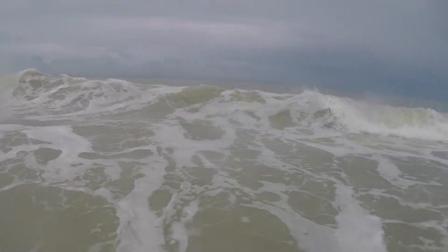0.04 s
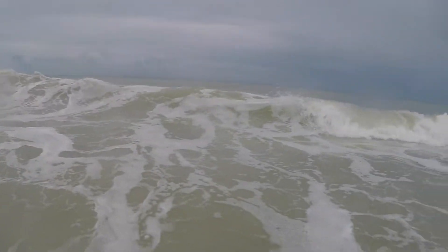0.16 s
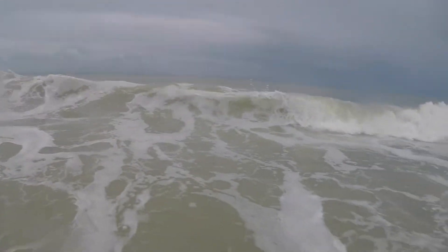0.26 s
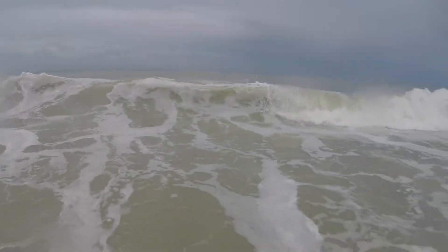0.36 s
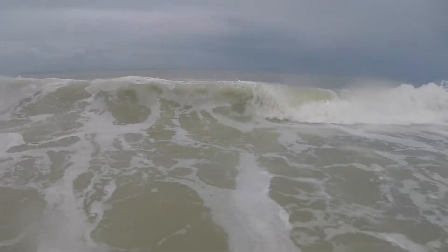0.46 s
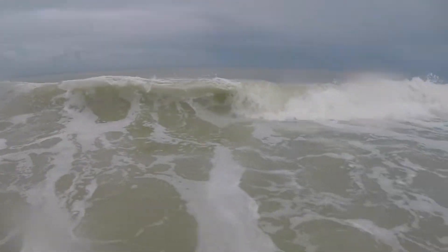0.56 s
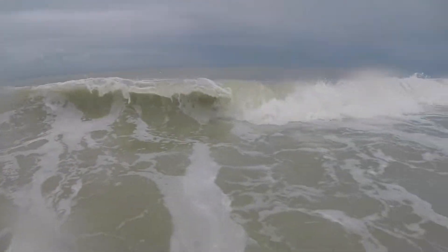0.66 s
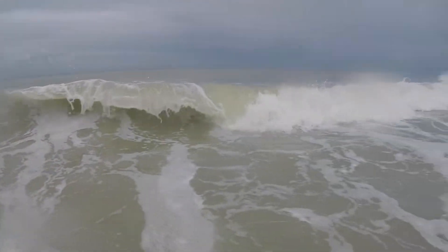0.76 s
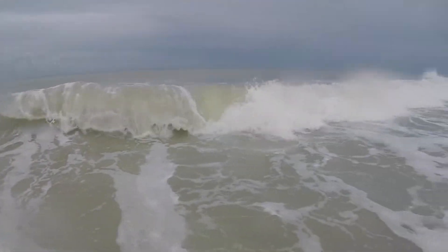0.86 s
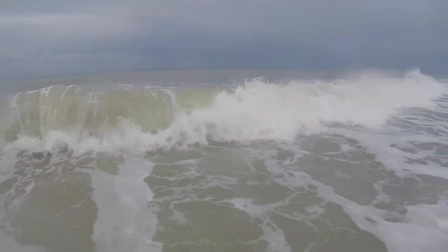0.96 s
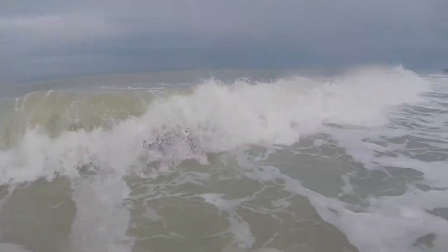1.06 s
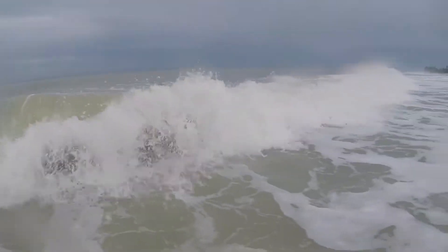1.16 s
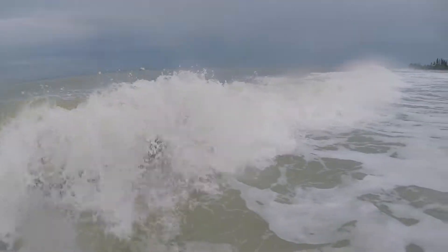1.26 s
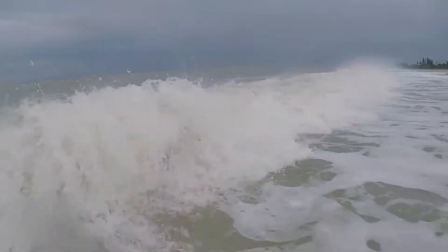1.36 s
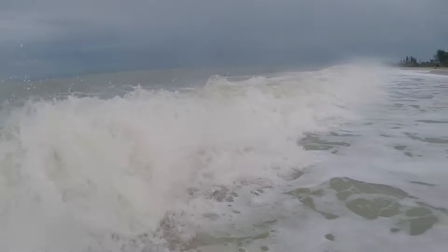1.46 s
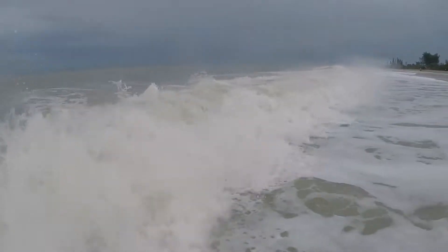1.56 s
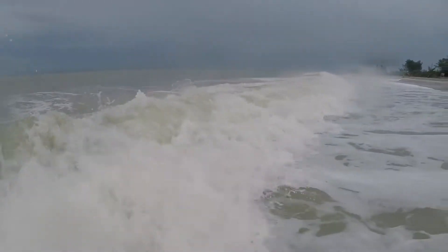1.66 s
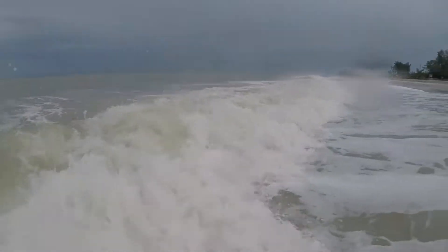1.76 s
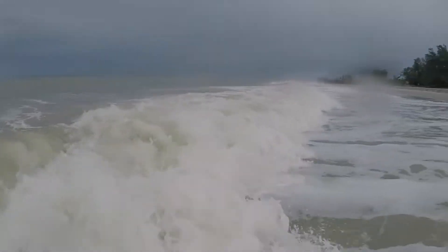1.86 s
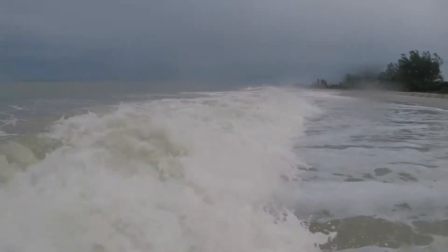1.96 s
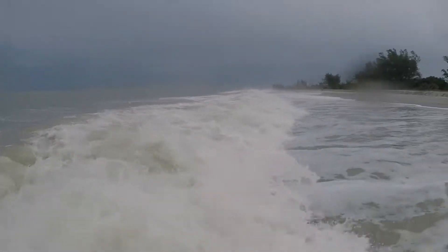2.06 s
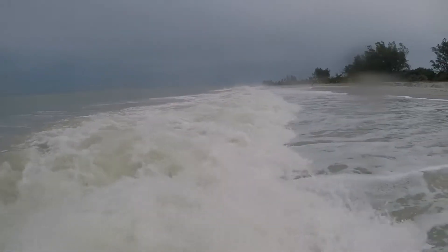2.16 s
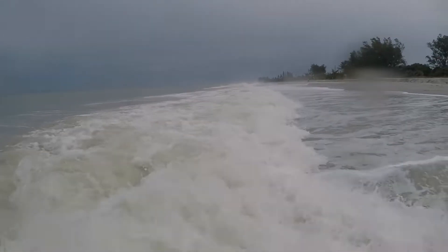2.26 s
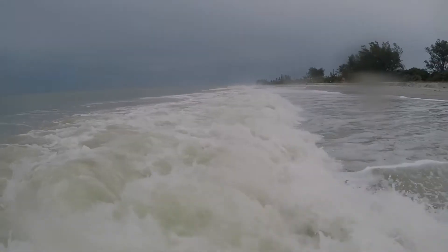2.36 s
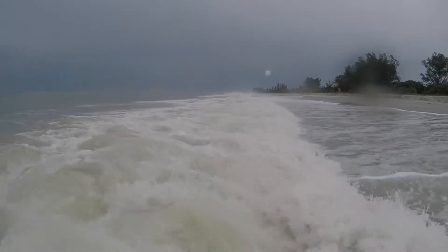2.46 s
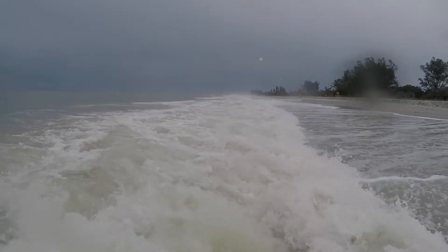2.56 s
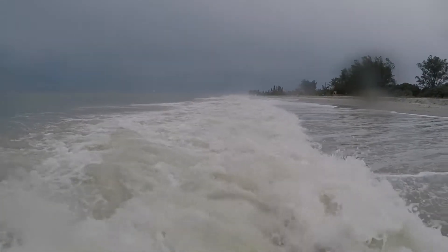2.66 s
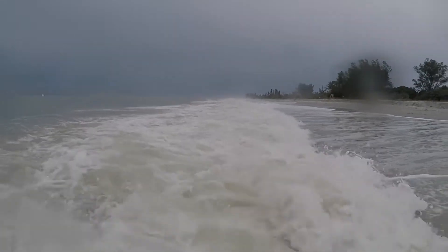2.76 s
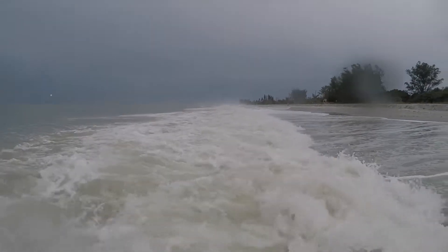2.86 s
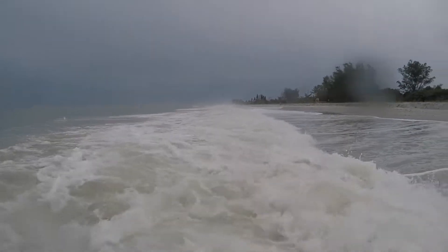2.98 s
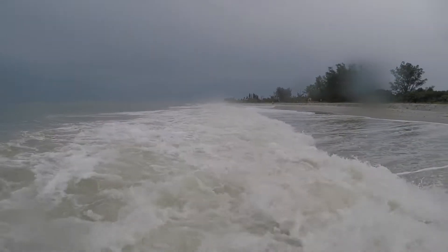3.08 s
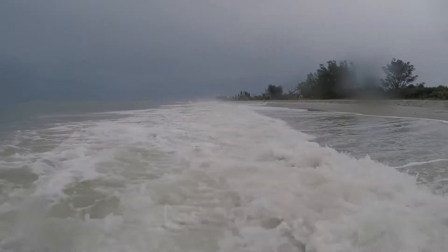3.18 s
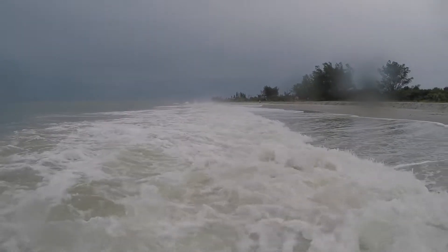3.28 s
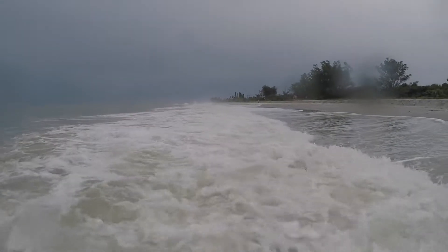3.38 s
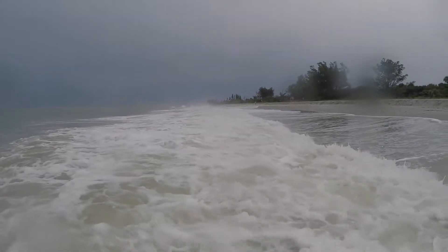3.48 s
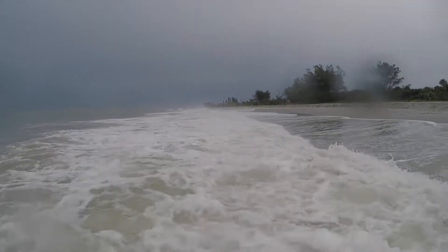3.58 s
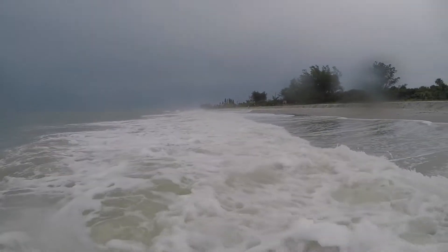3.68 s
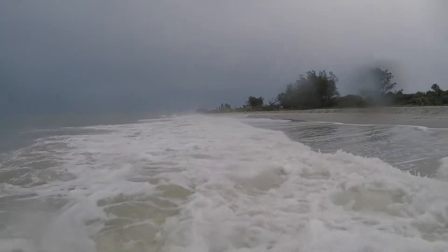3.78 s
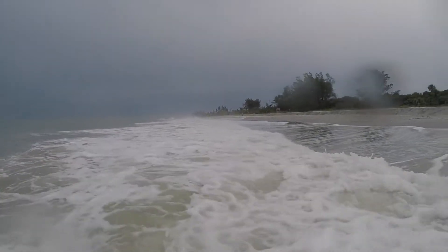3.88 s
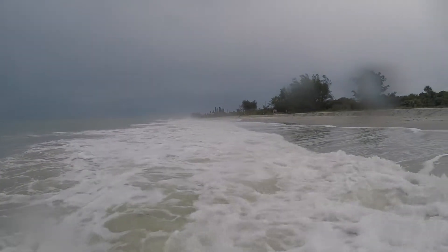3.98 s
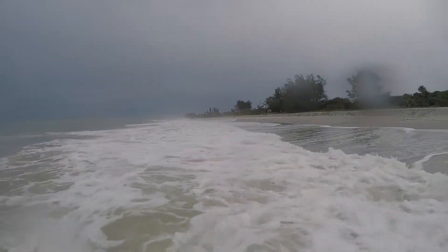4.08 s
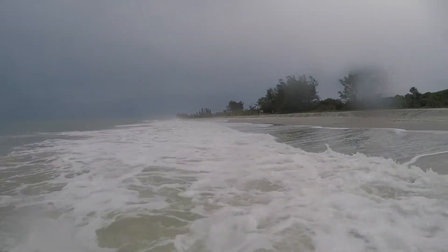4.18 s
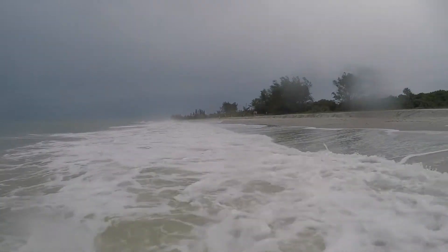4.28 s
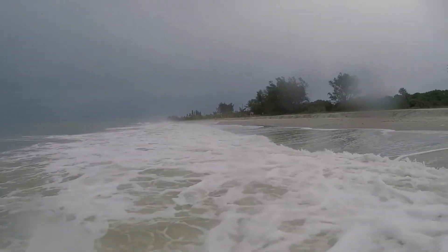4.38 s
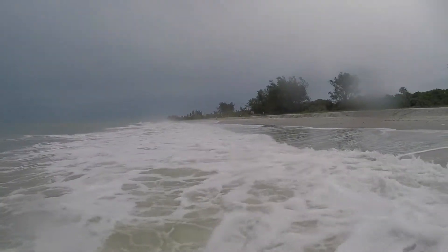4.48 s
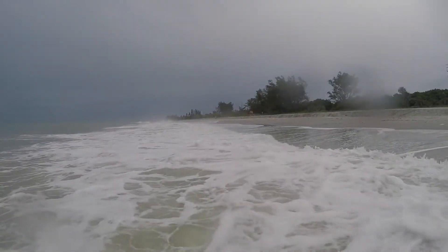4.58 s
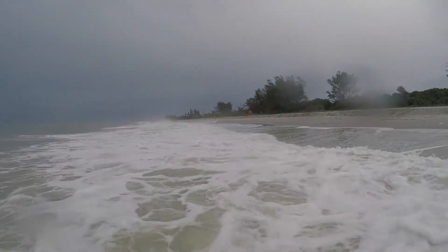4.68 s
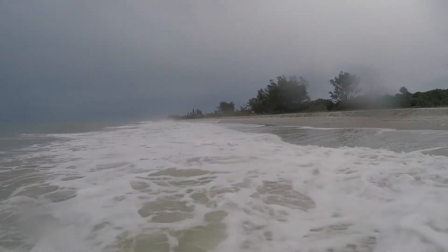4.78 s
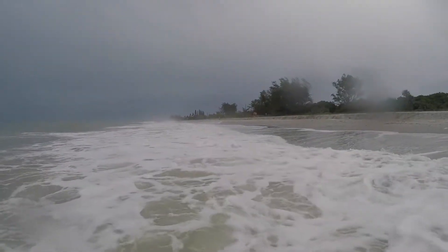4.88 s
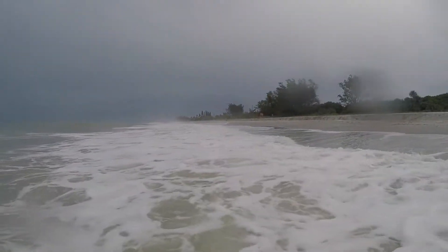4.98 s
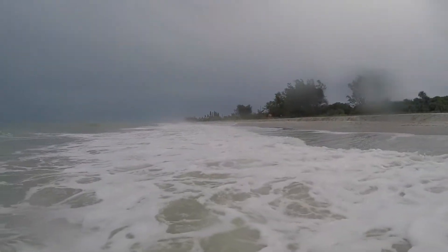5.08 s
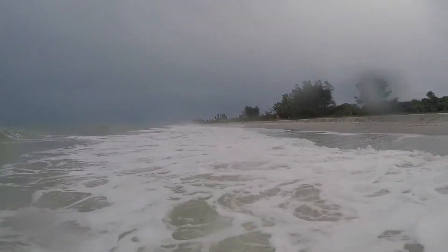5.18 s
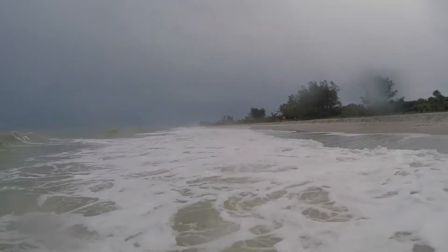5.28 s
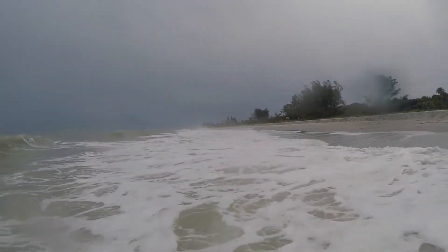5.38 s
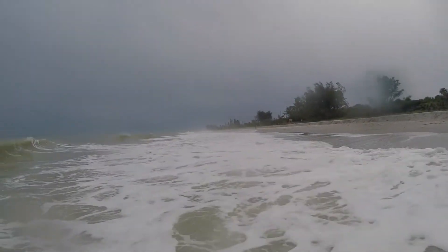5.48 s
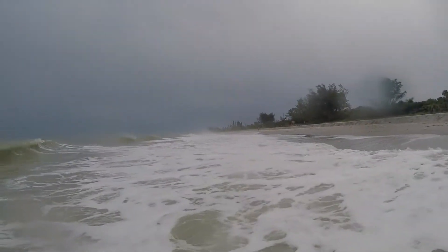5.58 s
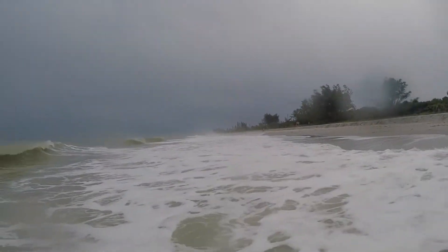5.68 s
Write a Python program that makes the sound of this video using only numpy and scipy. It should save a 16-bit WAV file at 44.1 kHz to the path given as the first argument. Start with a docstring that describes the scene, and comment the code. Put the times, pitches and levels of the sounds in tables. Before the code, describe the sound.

A stormy beach wave roars closer, plunges with bright spray, rushes past the muffled microphone, fizzes away, then fresh wash splashes in.

```python
"""The roar of a nearing wave on a stormy beach, heard from inside a waterproof case just above the water.
The wave steepens, plunges and throws spray; its foam rushes past, fizzes out, and fresh wash splashes in.
White water is filtered noise with bubble pops and rings, its bands flickering; the case adds resonances.
Slow noise makes the wind and the boom of air pockets; clicks through resonances make spray and slaps;
decaying sines make drops and thumps; a steady hiss makes the distant surf."""
import sys
import numpy as np
from scipy.fft import rfft, irfft
from scipy.io import wavfile
from scipy.ndimage import uniform_filter1d

SR = 44100
rng = np.random.default_rng(int(sys.argv[2]) if len(sys.argv) > 2 else 0)


def digitize_waveform(pressure):
    """Quantize a signal to 16-bit integers and store it at the path in sys.argv[1].

    Rows of a 2-D input are taken as channels; values are limited to [-1, 1].
    """
    field = np.atleast_2d(pressure).T
    bounded = np.clip(field, -1, 1)
    quanta = np.round(bounded * 32767).astype(np.int16)
    wavfile.write(sys.argv[1], SR, quanta)


N = 253134
TIME, FREQ = np.arange(N) / SR, np.maximum(np.fft.rfftfreq(N, 1 / SR), 1)  # s, Hz
TOP_HZ = 15250

# Surf far along the beach, relative spectrum: freq_hz [Hz], density_db [dB per Hz]
SHORE_SPECTRUM = [(60, -20), (160, 11.5), (350, 2), (600, -4), (1200, -4.5), (2000, -12), (2700, -9),
                  (4000, -1), (6000, -10), (9000, -13), (12000, -12), (15000, -15)]
SHORE_DB = -61

# Wind eddies, relative spectrum: freq_hz [Hz], density_db [dB per Hz]
EDDY_SPECTRUM = [(10, -8.5), (22, 5), (38, -1), (58, -10), (90, -17.5), (150, -26.5), (300, -44),
                 (900, -80)]
# Gusts over the steady wind: start_s [s], hold_s [s], level_db [dB]
GUSTS = [(1.587, 0.18, -34.5), (1.998, 0.59, -35.5), (2.768, 0.32, -40), (4.45, 0.28, -46)]
# Foam thumping the case: start_s [s], peak_db [dB]
THUMPS = [(1.678, -28), (1.725, -26.5), (1.7752, -26.5), (1.826, -24)]
# Modes struck by each thump: freq_hz [Hz], level_db [dB re the thump's peak], t60_s [s]
THUMP_MODES = [(160.3, -7, 0.23), (146, -9, 0.076), (81, 0, 0.044)]

# Pockets of trapped air, relative spectrum: freq_hz [Hz], density_db [dB per Hz]
POCKET_SPECTRUM = [(30, -11), (65, 1.5), (110, -3), (200, -3.5), (300, -8.5), (450, -17.5), (1000, -53)]

# Patter of droplets, relative spectrum: freq_hz [Hz], density_db [dB per Hz]
PATTER_SPECTRUM = [(1500, -27), (4000, 2), (7000, -2), (15000, -11)]
# Case resonances and shadows under the patter: freq_hz [Hz], width_hz [Hz], gain_db [dB]
PATTER_CASE = [(3380, 130, -5), (4350, 150, 28), (5800, 700, -11), (6930, 200, 5), (10200, 400, 13),
               (13450, 400, 5)]

# Slaps of water close by: start_s [s], level_db [dB], decay_s [s], centre_hz [Hz], width_hz [Hz]
SLAPS = [(.912, -42, 0.0074, 2750, 600), (0.934, -38.5, .014, 5000, 5000), (5.024, -46, 0.088, 1270, 450),
         (5.058, -44.5, 0.0051, 1900, 1500), (5.322, -54, .04, 4300, 1200),
         (5.429, -35.5, 0.0077, 3020, 2200), (5.607, -40, 0.013, 1590, 2000),
         (5.677, -41, 0.0096, 2400, 1100), (5.693, -44, 0.022, 2760, 450), (5.706, -40, .006, 2900, 3500)]
# Single drops: start_s [s], pitch_hz [Hz], peak_db [dB]
DROPS = [(3.606, 2450, -44), (3.642, 2020, -38), (3.655, 2020, -48), (4.383, 2750, -49), (4.419, 1420, -49),
         (4.436, 2100, -48), (4.444, 2230, -51)]

# Churning water, relative spectrum: freq_hz [Hz], density_db [dB per Hz]
WATER_SPECTRUM = [(80, -21), (200, -3), (300, 0.5), (450, 0.5), (1000, -3.5), (2000, -2), (3000, -7),
                  (4000, -8), (5500, -9), (7500, -14.5), (9000, -19.5), (12000, -22), (15000, -27)]
# Case resonances and shadows, which depend on where the sound comes from:
# freq_hz [Hz], width_hz [Hz], gain_db [dB]
APPROACH_CASE = [(790, 120, 2), (1210, 170, 5.5), (1600, 200, -1.5), (2040, 250, 5.5), (2540, 130, -5),
                 (2630, 150, 10), (3250, 260, -4), (3500, 89, 5), (3720, 230, -10), (4100, 240, 5.5),
                 (4850, 500, 5.5), (5300, 250, 4.5), (5730, 310, -5), (6080, 200, 5.5), (11100, 760, 6.5),
                 (13400, 350, 5)]
BREAKER_CASE = [(600, 120, 1), (774, 170, 7), (996, 210, -4.5), (1253, 265, 5), (1605, 310, -3.5),
                (2080, 340, 6.5), (2717, 270, 5), (3110, 120, 6), (3420, 230, -3.5), (5000, 200, 4.5),
                (6500, 370, -4.5), (7060, 600, 2), (10400, 360, 1), (12080, 100, 6), (12600, 500, -2)]
WASH_CASE = [(550, 250, 4.5), (773, 100, 7), (950, 220, -5), (1260, 490, 6.5), (1670, 94, -16),
             (2340, 120, 6), (2720, 380, 2.5), (3500, 98, 6.5), (3960, 120, -4), (4220, 330, 8.5),
             (5100, 280, 4), (5930, 310, -8), (6100, 130, 6), (8100, 300, 3), (12400, 700, -6),
             (13400, 450, 10)]
# Where large, middling and fine bubbles sound: low_hz [Hz], high_hz [Hz]
BUBBLE_ZONES = [(200, 900), (1000, 3500), (6000, 15000)]
BAND_HZ = np.geomspace(100, 14000, 13)  # centres of the flickering bands
# Roar of the breaker as it passes and fizzes out: time_s [s], level_db [dB]
BREAKER_ROAR = [(.92, -44.5), (1.28, -41), (1.62, -37.5), (2.1, -38), (2.7, -39.5), (3.15, -42),
                (3.5, -49.5), (4.15, -56.5), (4.93, -60.8)]
# Masses of foam fold over with a deep swell: time_s [s], gain_db [dB]
FOLDS = [(2.2, 1.5), (2.93, 0.5)]
# Surges of the wash: start_s [s], hold_s [s], level_db [dB]
SURGES = [(5.003, .04, -52.5), (5.291, 0.07, -44.5), (5.418, 0.0092, -43), (5.582, .008, -49),
          (5.666, 0.034, -47.5)]

# The lip plunges, the foam front reaches the case, fresh wash runs in
PLUNGE_S, FRONT_S, WASH_S = .87, 1.35, 4.98

# The wind is weaker in the lee of rising water
LEE_DB, WIND_DB, GUST_ATTACK_S, GUST_RELEASE_S = -50.5, -46, 0.086, 0.23

# Air pockets boom under the standing wave, loudest as its tube collapses
HOLLOW_DB, COLLAPSE_DB, COLLAPSE_S, COLLAPSE_WIDTH_S = -47, -42, 1.52, 0.24
FOAM_BOOM_DB, LULL_BOOM_DB = -8.5, -62  # relative to the roar; steady
WASH_BOOM_DB, WASH_BOOM_BUILD_S = -48, 0.74

# The shower from the lip grows and rings higher until the foam front has passed
SPRAY_DB, SPRAY_GROW_DB_PER_S, SPRAY_HOLD_S, SPRAY_RELEASE_S = -45.5, 5.5, .8, .1
SPRAY_HZ, SPRAY_CLIMB_HZ_PER_S = 2662, 240
# The wash throws a small shower that builds as it closes in
WASH_SPRAY_S, WASH_SPRAY_BUILD_S, WASH_SPRAY_DB, WASH_SPRAY_HZ = 5.36, 0.45, -48, 2760

# The nearing wave grows a little louder as it steepens
APPROACH_DB, STEEPEN_DB, STEEPEN_S = -47, 2, 0.36
# Large bubbles gain as the breaker rolls on (dB relative to the roar; s after the plunge)
YOUNG_LARGE_DB, ROLLED_LARGE_DB, ROLL_S = -6.5, -3.5, 1.2
FOLD_WIDTH_S, FOLD_LARGE_DB = 0.057, 2.5
# Fizz flares while the thrown water falls back (dB relative to the roar; s)
FOAM_FIZZ_DB, FLARE_DB, FLARE_S, FLARE_WIDTH_S = -10, 4.5, 1.45, 0.39
# Spent foam is left with its finest bubbles
SPENT_S, SPENT_FIZZ_DB_PER_S = 3.64, 4.5
# The wash runs in low, under its surges
WASH_DB, SURGE_ATTACK_S, SURGE_RELEASE_S = -51.5, 0.026, 0.038


def undb(db):
    """Logarithmic level: decibels to amplitude gain."""
    return 10 ** (np.asarray(db) / 20)


def unit(x):
    """Normalization: scale by the standard deviation to unit spread."""
    return x / np.std(x)


def together(*gains):
    """Incoherent addition: the powers of unrelated sounds add."""
    return np.sqrt(sum(gain ** 2 for gain in gains))


def ramp(start, length):
    """Linear growth from 0 to 1."""
    return np.clip((TIME - start) / length, 0, 1)


def envelope(start, attack, hold, release):
    """Transient: linear attack, hold and exponential release."""
    after_hold = np.maximum(TIME - start - attack - hold, 0)
    return ramp(start, attack) * np.exp(-after_hold / release)


def hump(centre, width):
    """Gaussian swell of height 1."""
    return np.exp(-((TIME - centre) / width) ** 2)


def response(points, bumps=()):
    """Frequency response: a broad slope carrying Lorentzian resonances and shadows (in dB)."""
    hz, db = np.transpose(points)
    db = np.interp(np.log(FREQ), np.log(hz), db)
    for centre, width, height in bumps:
        db = db + height / (1 + (2 * (FREQ - centre) / width) ** 2)
    return undb(db)


def colour(x, gain):
    """Linear filtering: multiply the spectrum by a gain at each frequency."""
    return irfft(rfft(x) * gain, N)


def walk(rate):
    """Low-passed noise: a smooth fluctuation of unit spread, changing about rate times a second."""
    return unit(colour(rng.standard_normal(N), np.exp(-(FREQ / rate) ** 2)))


def pops(rate, spread_db):
    """Random impulse train: bursts at rate per second, with exponentially spread levels."""
    size = undb(spread_db * np.minimum(rng.exponential(size=N), 4))
    struck = rng.random(N) < rate / SR
    return unit(struck * size * rng.choice([-1, 1], N))


def ring(start, hz, t60, rise=0):
    """Damped oscillation: a struck mode decays 60 dB in t60 while its pitch may rise."""
    age = np.maximum(TIME - start, 0) / t60
    turns = hz * t60 * age * (1 + rise * np.minimum(age, 1) / 2)
    return np.exp(-np.log(1000) * age) * np.sin(2 * np.pi * turns)


def breaker_roar():
    """Level (dB) of the breaker's roar, linear between its points."""
    time_s, level_db = np.transpose(BREAKER_ROAR)
    return np.interp(TIME, time_s, level_db)


def shore(swell_db=1.6):
    """Superposition: breakers far along the beach merge to a soft, slowly swelling hiss."""
    hiss = unit(colour(rng.standard_normal(N), response(SHORE_SPECTRUM, BREAKER_CASE)))
    return hiss * undb(SHORE_DB + swell_db * walk(1.2))


def wind(gust_db=2.2):
    """Turbulence: eddies rumble on the case, steadily and in gusts."""
    exposed = ramp(PLUNGE_S, FRONT_S - PLUNGE_S) - ramp(WASH_SPRAY_S, WASH_SPRAY_BUILD_S)
    steady = undb(LEE_DB + (WIND_DB - LEE_DB) * exposed)
    gusts = (undb(level_db) * envelope(start_s, GUST_ATTACK_S, hold_s, GUST_RELEASE_S)
             for start_s, hold_s, level_db in GUSTS)
    eddies = unit(colour(rng.standard_normal(N), response(EDDY_SPECTRUM)))
    # dividing by the running level removes long lulls
    eddies = eddies / np.sqrt(uniform_filter1d(eddies ** 2, size=8000))
    eddies = eddies * undb(gust_db * walk(11))
    return together(steady, *gusts) * eddies


def thumps():
    """Modal excitation: the foam front strikes the case, whose modes ring down."""
    return -sum(undb(peak_db + level_db) * ring(start_s, freq_hz, t60_s)
                for start_s, peak_db in THUMPS for freq_hz, level_db, t60_s in THUMP_MODES)


def boom(empty_s=.25):
    """Volume pulsation: large pockets of trapped air throb under the foam."""
    hollow = undb(HOLLOW_DB) * (1 - ramp(FRONT_S, empty_s))
    collapse = undb(COLLAPSE_DB) * hump(COLLAPSE_S, COLLAPSE_WIDTH_S)
    foam = undb(breaker_roar() + FOAM_BOOM_DB) * ramp(PLUNGE_S, FRONT_S - PLUNGE_S)
    wash = undb(WASH_BOOM_DB) * ramp(WASH_S, WASH_BOOM_BUILD_S) ** 2
    strength = together(hollow, collapse, foam, wash, undb(LULL_BOOM_DB))
    return strength * unit(colour(rng.standard_normal(N), response(POCKET_SPECTRUM)))


def showers(attack_s=0.038):
    """Source strength and ring pitch (Hz) of the spray from the plunging lip and from the wash."""
    age = np.clip(TIME - PLUNGE_S, 0, SPRAY_HOLD_S)
    growth = undb(SPRAY_DB + SPRAY_GROW_DB_PER_S * age)
    lip = growth * envelope(PLUNGE_S, attack_s, SPRAY_HOLD_S, SPRAY_RELEASE_S)
    wash = undb(WASH_SPRAY_DB) * ramp(WASH_SPRAY_S, WASH_SPRAY_BUILD_S)
    pitch_hz = np.where(TIME < WASH_S, SPRAY_HZ + SPRAY_CLIMB_HZ_PER_S * age, WASH_SPRAY_HZ)
    return lip + wash, pitch_hz


def spray(ring_width_hz=420, patter_db=-10):
    """Resonance under random impacts: droplets ring the case in a band that climbs as the lip nears."""
    strength, pitch_hz = showers()
    narrow = 1 / np.sqrt(1 + (2 * FREQ / ring_width_hz) ** 6)
    phase = 2 * np.pi * np.cumsum(pitch_hz) / SR
    # two low-passed click trains on quadrature carriers form the moving band
    ringing = sum(colour(pops(2500, spread_db=5.0), narrow) * carrier(phase) for carrier in (np.sin, np.cos))
    patter = colour(pops(1600, spread_db=14), response(PATTER_SPECTRUM, PATTER_CASE))
    return strength * (unit(ringing) + undb(patter_db) * unit(patter))


def drops():
    """Bubble oscillation: stray drops plink in the lull with rising pitch."""
    return sum(undb(peak_db) * ring(start_s, pitch_hz, t60=.035, rise=0.11)
               for start_s, pitch_hz, peak_db in DROPS)


def slaps(attack_s=0.00071):
    """Cavity resonance: sheets of water slap down in bursts of pops, pitched by the air they trap."""
    out = 0
    for start_s, level_db, decay_s, centre_hz, width_hz in SLAPS:
        age = np.maximum(TIME - start_s, 0)
        onset = 1 - np.exp(-age / attack_s)
        burst = onset * np.exp(-np.maximum(age - 2 * attack_s, 0) / decay_s)
        detuning = (FREQ ** 2 - centre_hz ** 2) / (FREQ * width_hz)
        cavity = 1 / np.sqrt(1 + detuning ** 2)
        slap = colour(pops(15000, spread_db=-2.5), cavity * response([(4500, 5), (15000, -9)]))
        out = out + undb(level_db) * burst * unit(slap)
    return out


def bubbles(count, low_hz, high_hz, cycles, spread_db, rise):
    """Bubble resonance: newly trapped air rings for some cycles, climbing in pitch near the surface."""
    out = np.zeros(N + SR)
    for when, pitch, size, life in rng.random((count, 4)):
        hz = low_hz * (high_hz / low_hz) ** pitch
        turns = cycles * (.5 + life)
        age = np.linspace(0, 1, int(turns * SR / hz))
        peak = undb(spread_db * min(-np.log(1 - size), 4))
        phase = 2 * np.pi * turns * age * (1 + rise * age / 2)
        start = int(when * N)
        out[start:start + len(age)] += peak * np.exp(-np.log(100) * age) * np.sin(phase)
    return unit(out[:N])


def zone_level(spectrum, low_hz, high_hz):
    """Parseval's theorem: the level (dB) in a band from its summed spectral power."""
    inside = (FREQ > low_hz) & (FREQ < high_hz)
    return 10 * np.log10(2 * np.sum(abs(spectrum[inside]) ** 2) / N ** 2)


def churn(course, case, pop_rate, pop_db, bubble_db, tumble_db, flicker_db):
    """Superposition in white water: far bubbles merge to a rush, near ones pop and ring, all in clumps."""
    level_db, large_db, fizz_db = course
    near = undb(pop_db) * pops(pop_rate, spread_db=2.5)
    ringing = undb(bubble_db) * bubbles(
        count=2500, low_hz=394.6, high_hz=4540, cycles=16.3, spread_db=1.5, rise=0.27)
    rush = unit(colour(rng.standard_normal(N) + near, response(WATER_SPECTRUM, case)))
    cased_ringing = colour(ringing, response([(20, 0), (20000, 0)], case))
    spectrum = rfft(rush + cased_ringing)
    large, middle, fine = (zone_level(spectrum, low_hz, high_hz) for low_hz, high_hz in BUBBLE_ZONES)
    # the whole mass surges; each bubble size follows its share of the foam
    tumble = tumble_db * walk(21)
    out, below = 0, walk(30)
    for hz, pick in zip(BAND_HZ, np.eye(len(BAND_HZ))):
        band = irfft(spectrum * np.interp(np.log(FREQ), np.log(BAND_HZ), pick), N)
        deep = np.interp(np.log(hz), np.log([700, 1400]), [1, 0])
        high = np.interp(np.log(hz), np.log([2800, 7500]), [0, 1])
        tilt = deep * (large_db + middle - large) + high * (fizz_db + middle - fine)
        # neighbouring bands share a fluctuation, so they come and go together
        above = walk(34)
        out = out + band * undb(tilt + flicker_db * (below + above))
        below = above
    return out * undb(level_db - middle + tumble)


def nearing_course(large_db=-5.5, fizz_db=-10.5):
    """Spectral balance: roar (dB), large bubbles and fizz (dB re roar) of the steepening wave."""
    return APPROACH_DB + STEEPEN_DB * ramp(PLUNGE_S - STEEPEN_S, STEEPEN_S), large_db, fizz_db


def breaker_course():
    """Spectral balance of the breaker: bright at first, then deep, at last a thin fizz."""
    level_db = breaker_roar()
    large_db = YOUNG_LARGE_DB + (ROLLED_LARGE_DB - YOUNG_LARGE_DB) * ramp(PLUNGE_S, ROLL_S) ** 2
    for time_s, gain_db in FOLDS:
        fold = hump(time_s, FOLD_WIDTH_S)
        level_db = level_db + gain_db * fold
        large_db = large_db + FOLD_LARGE_DB * fold
    flare = FLARE_DB * hump(FLARE_S, FLARE_WIDTH_S)
    spent = SPENT_FIZZ_DB_PER_S * np.maximum(TIME - SPENT_S, 0)
    return level_db, large_db, FOAM_FIZZ_DB + flare + spent


def wash_course(large_db=-3, fizz_db=-9.0, dulling=0.35, brighten_db=3):
    """Spectral balance of the wash: its fizz swells less than its roar and grows with its spray."""
    surges = (undb(level_db) * envelope(start_s, SURGE_ATTACK_S, hold_s, SURGE_RELEASE_S)
              for start_s, hold_s, level_db in SURGES)
    level_db = 20 * np.log10(together(undb(WASH_DB), *surges))
    showering = ramp(WASH_SPRAY_S, WASH_SPRAY_BUILD_S) ** 2
    return level_db, large_db, fizz_db - dulling * (level_db - WASH_DB) + brighten_db * showering


def surf(plunge_fade_s=0.047, inflow_fade_s=0.033):
    """Power crossfading: the nearing wave gives way to its breaker, and the spent foam to fresh wash."""
    plunge = ramp(PLUNGE_S, plunge_fade_s)
    unbroken = 1 - ramp(PLUNGE_S, FRONT_S - PLUNGE_S) ** 2
    inflow = ramp(WASH_S, inflow_fade_s) ** 2
    nearing = churn(nearing_course(), APPROACH_CASE, pop_rate=3000, pop_db=-6.5,
                    bubble_db=-17.0, tumble_db=0.5, flicker_db=0.23)
    breaking = churn(breaker_course(), BREAKER_CASE, pop_rate=3000, pop_db=-4,
                     bubble_db=-12, tumble_db=0.5, flicker_db=0.52)
    washing = churn(wash_course(), WASH_CASE, pop_rate=2000, pop_db=-1.5,
                    bubble_db=-8.5, tumble_db=0.96, flicker_db=0.2)
    foam = breaking * np.sqrt(plunge * (1 - inflow))
    return nearing * np.sqrt(unbroken) + foam + washing * np.sqrt(inflow)


def scene():
    """Linear superposition: all sources add at one point inside the case, alike in both channels."""
    mono = shore() + wind() + thumps() + boom() + spray() + drops() + slaps() + surf()
    return np.array([mono, mono])


def record(dry):
    """Band limiting: a steep low-pass falls to silence within 100 Hz above TOP_HZ."""
    return colour(dry, np.clip((TOP_HZ - FREQ) / 100 + 1, 0, 1))


dry = scene()
out = record(dry)
digitize_waveform(out)
```